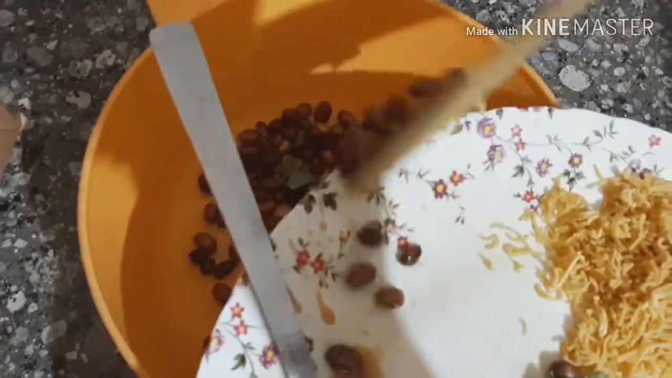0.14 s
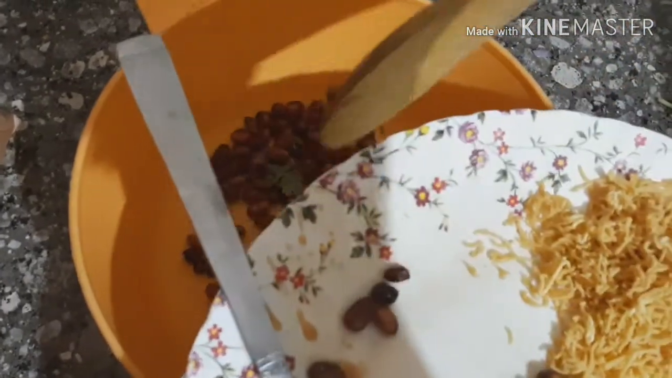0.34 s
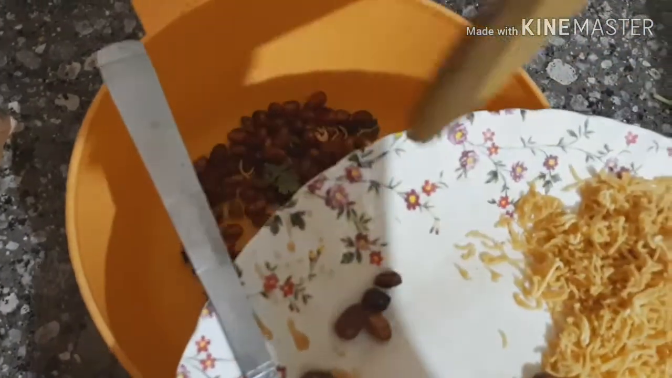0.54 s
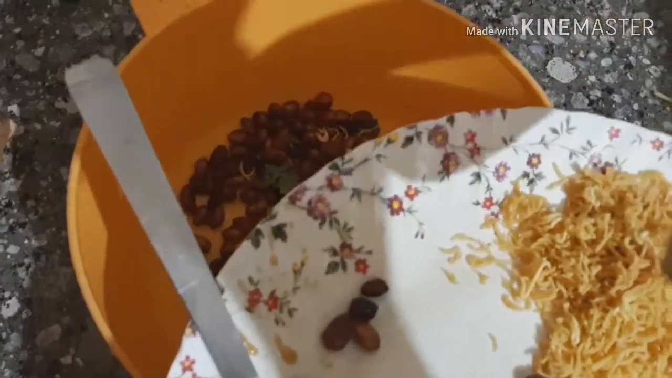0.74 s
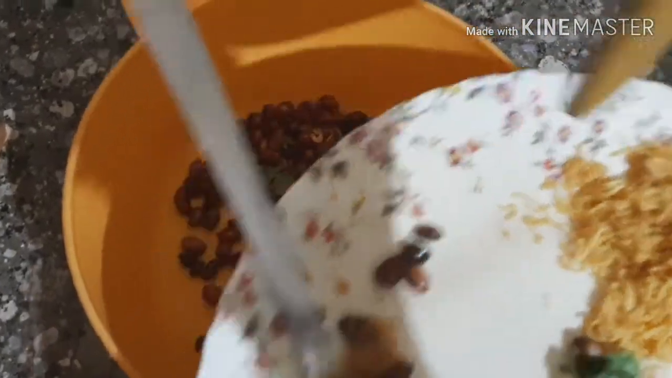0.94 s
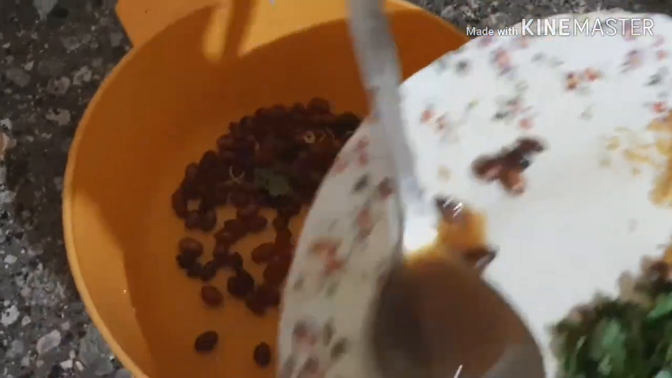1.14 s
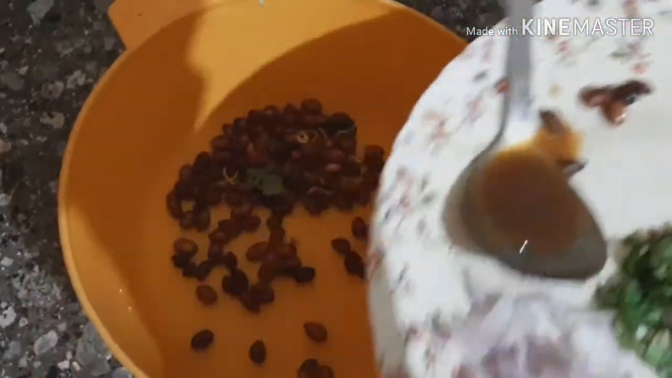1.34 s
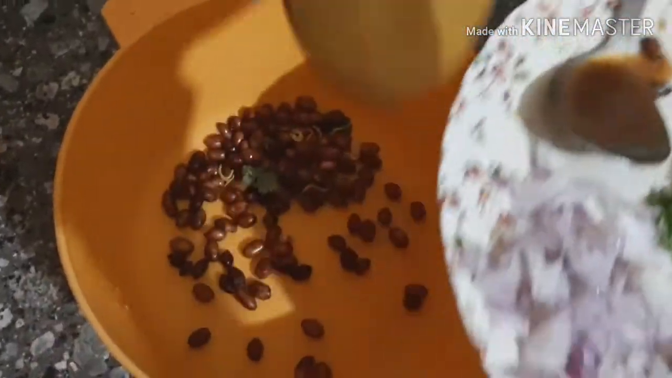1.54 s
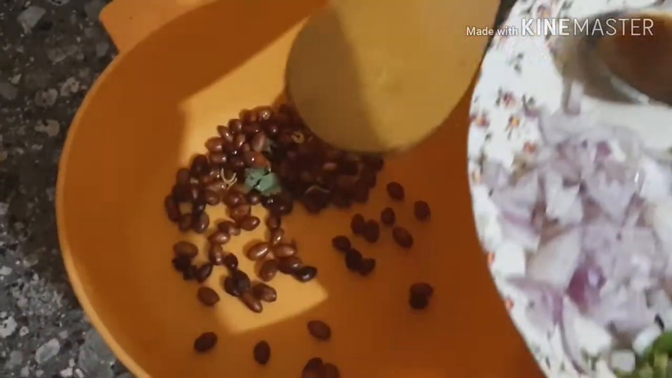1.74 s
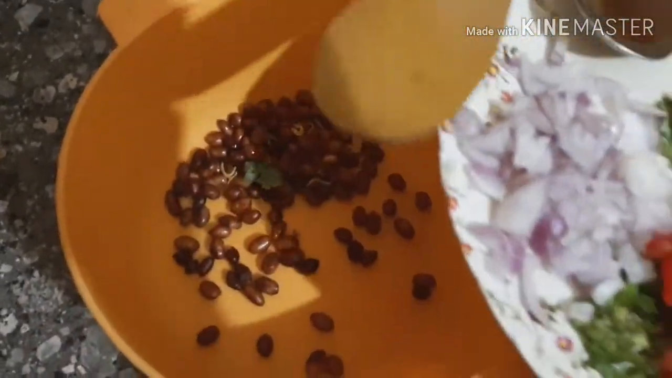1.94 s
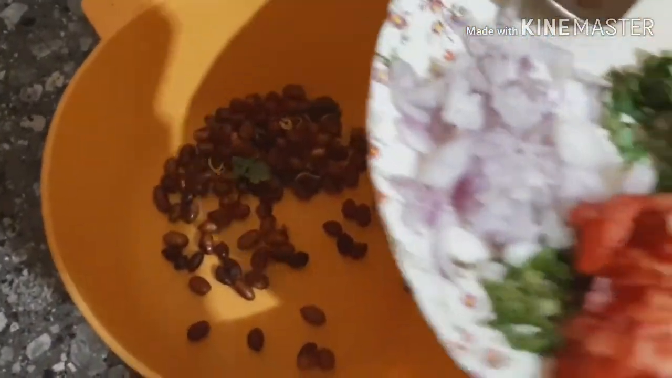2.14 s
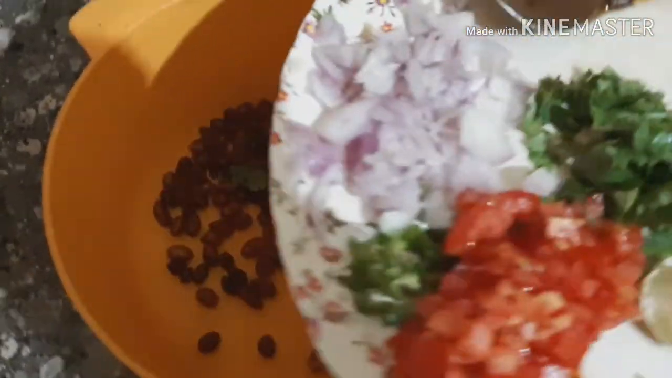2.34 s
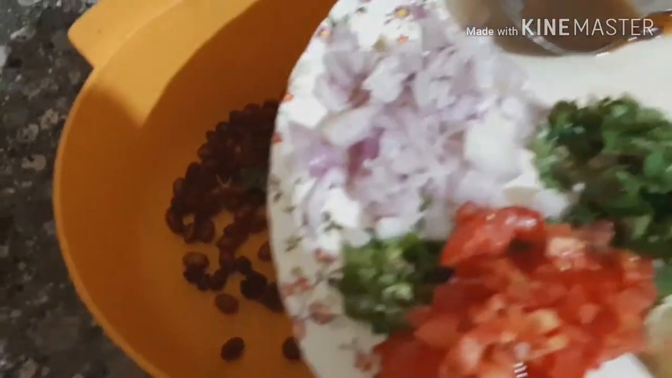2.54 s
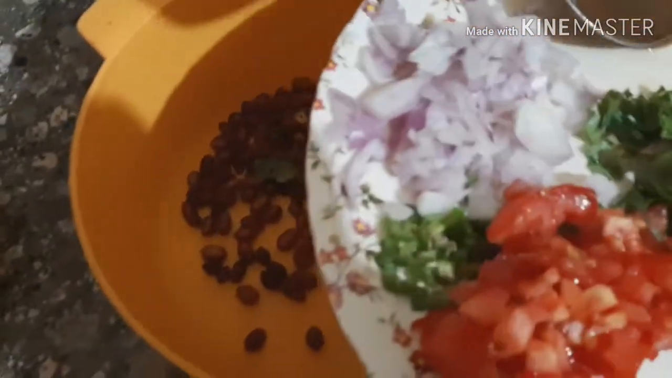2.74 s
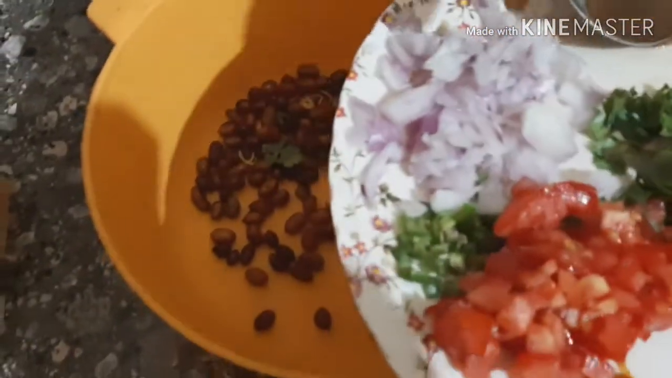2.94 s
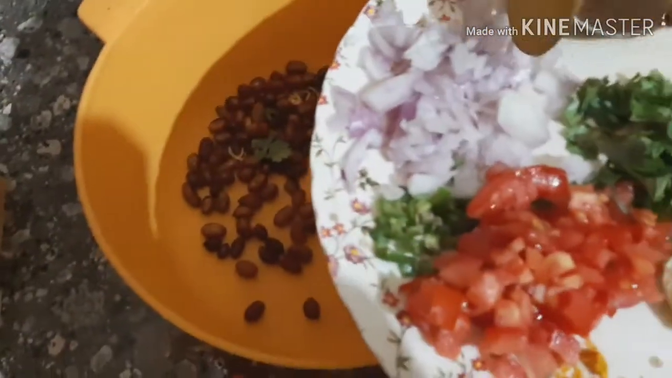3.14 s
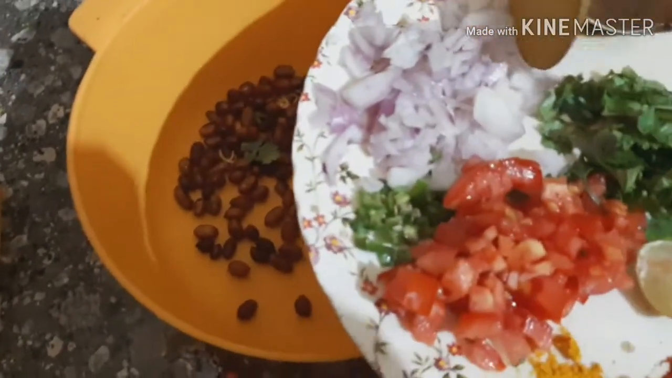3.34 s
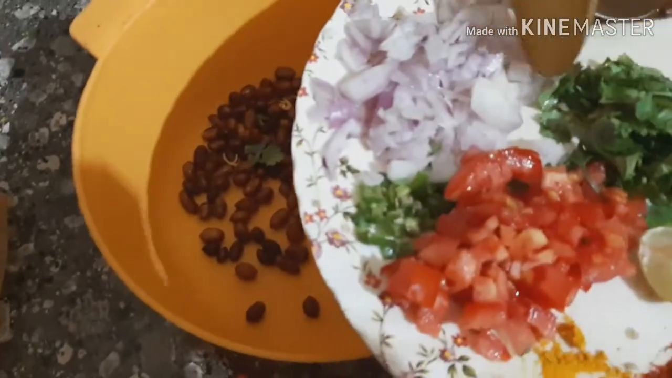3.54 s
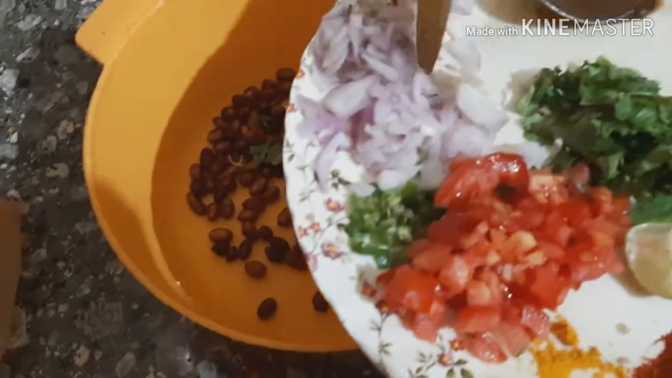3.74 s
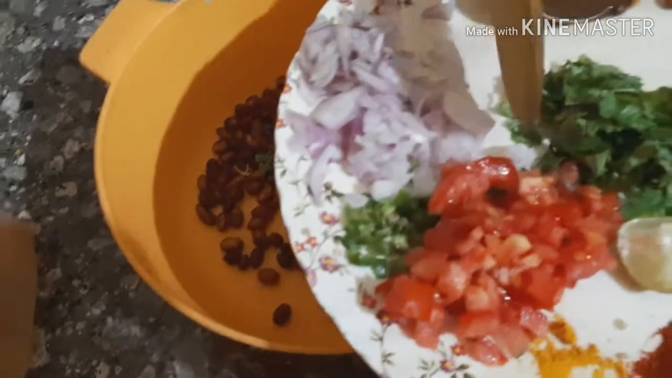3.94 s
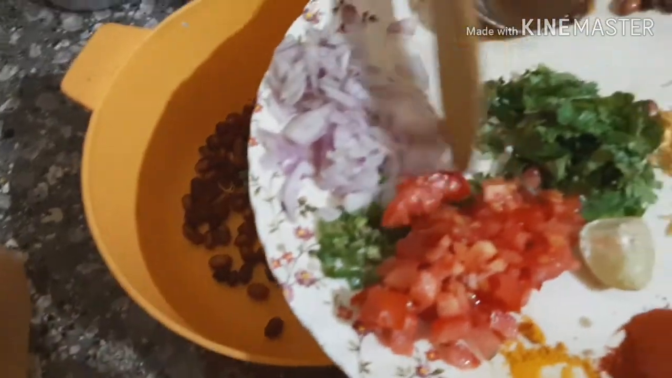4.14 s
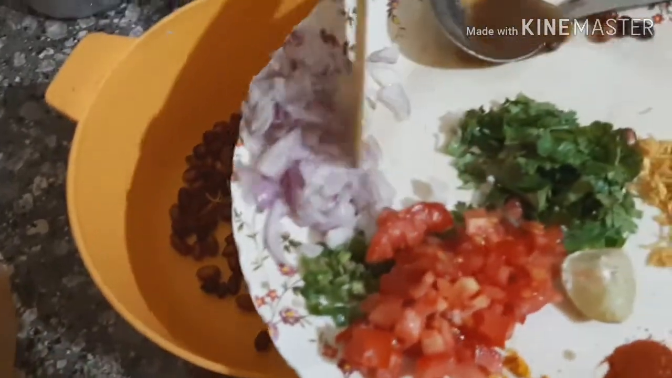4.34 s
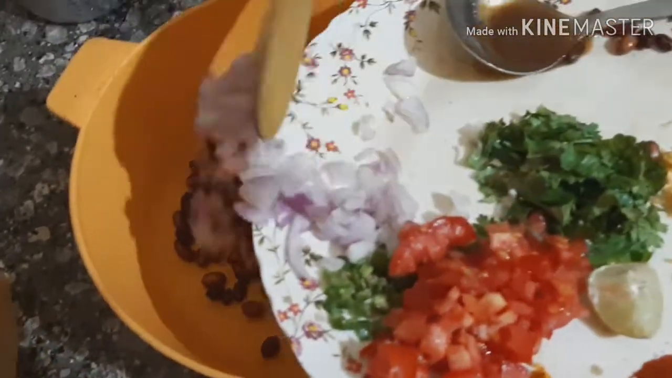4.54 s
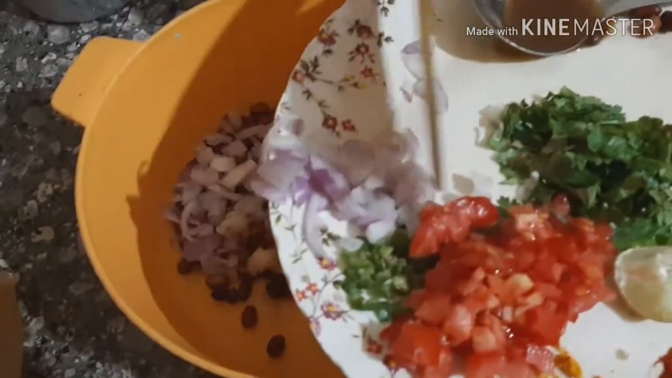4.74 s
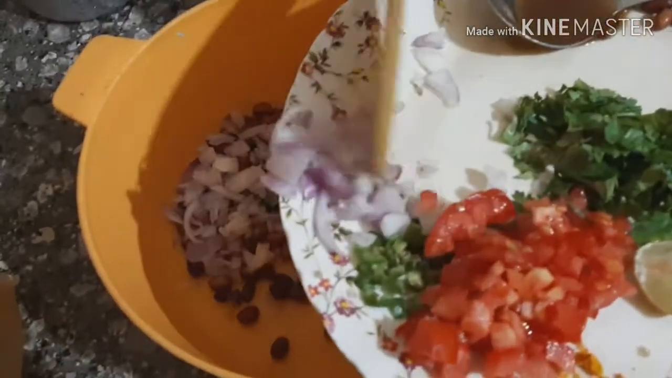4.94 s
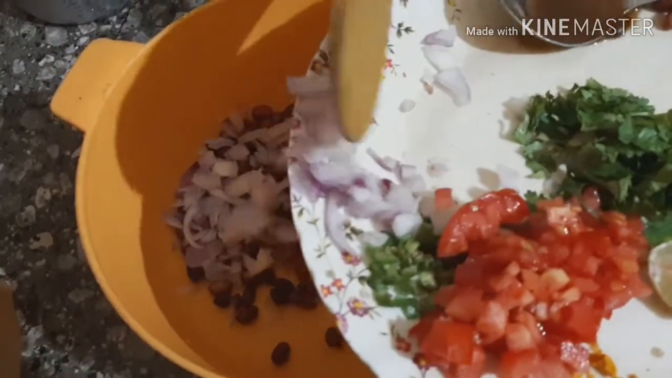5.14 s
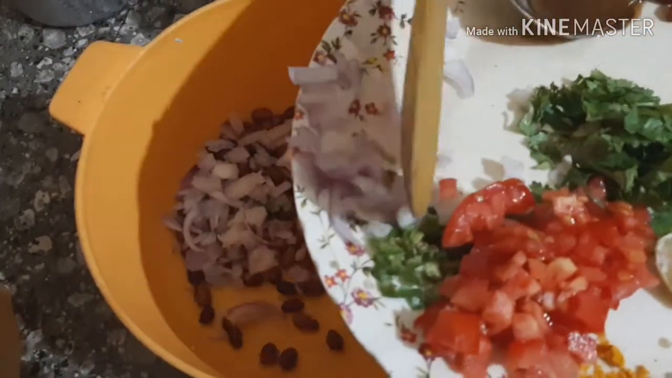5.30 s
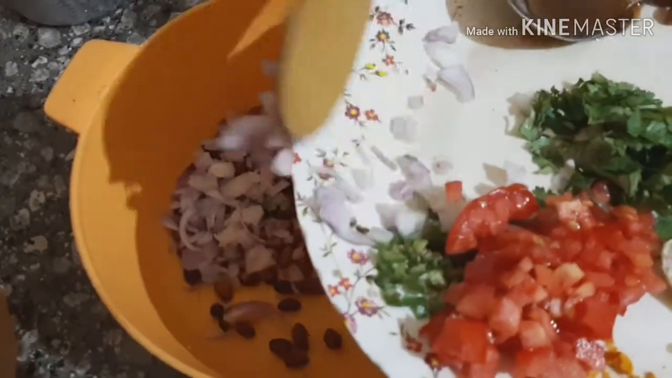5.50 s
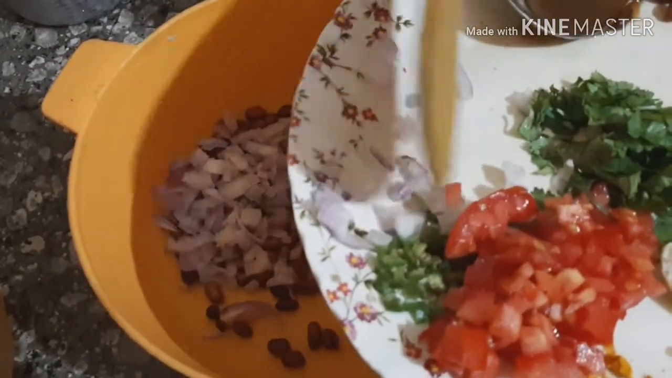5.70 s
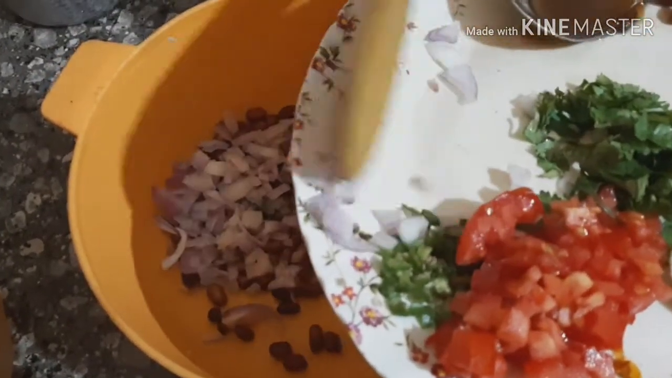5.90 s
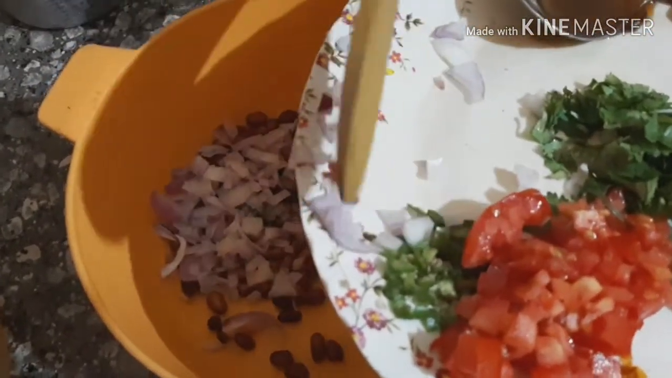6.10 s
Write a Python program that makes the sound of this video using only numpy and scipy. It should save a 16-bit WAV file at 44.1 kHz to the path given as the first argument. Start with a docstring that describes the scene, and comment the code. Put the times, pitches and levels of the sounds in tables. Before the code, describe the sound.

A wooden spatula clacks and scrapes beans and chopped onion off a ceramic plate into a plastic bowl, with quiet pauses in a small kitchen.

```python
"""Scraping a plate into a bowl

A wooden spatula scrapes beans and chopped onion off a ceramic plate into a plastic bowl.
Knocks excite decaying modes of plate and bowl; trains of tiny slips drive the strokes, rustles and slides.
A small hard kitchen answers with sparse decaying taps, over soft noise and a fridge-like hum.
Two microphone ports a few centimetres apart hear the work at slightly different moments."""
import sys
import numpy as np
from scipy import signal
from scipy.fft import irfft
from scipy.io import wavfile
from scipy.ndimage import uniform_filter1d, map_coordinates

SR = 44100
rng = np.random.default_rng(int(sys.argv[2]) if len(sys.argv) > 2 else 0)


def file_out(sig):
    """Save sig as 16-bit WAV at sys.argv[1]."""
    # one column per channel
    cols = np.atleast_2d(sig).T
    # limit, then scale
    lim = np.clip(cols, -1, 1)
    pcm = np.round(lim * 32767).astype(np.int16)
    wavfile.write(sys.argv[1], SR, pcm)


N = 276258

# modes of the free plate, level before differentiation: (frequency [Hz], level [dB], t60 [s])
PLATE_MODES = [(1060, -6, 0.012), (1330, -9.5, .015), (1350, -3.5, 0.076), (1523, 18.5, 0.041),
               (1837, 18, 0.011), (2077, 16.5, 0.019), (2439, 13.5, 0.0036), (2750, -1.5, 0.015),
               (2980, -3.5, 0.019), (3475, 6.5, 0.0042), (3726, -21.5, 0.0085), (4850, -17.5, 0.016),
               (5500, -49, 0.0078), (6060, -31, 0.006)]
# modes of the bowl: (frequency [Hz], level [dB], t60 [s])
BOWL_MODES = [(329, -6.5, 0.17), (437, -10, 0.088), (460, 1.5, 0.035), (582, 7, 0.067), (671, 15.5, 0.024),
              (753, 7.5, 0.02), (825, 6.5, 0.038), (972, 6, 0.033), (1112, -2, .015)]


def gain_of(db):
    """Decibels to gain."""
    return 10 ** (np.asarray(db) / 20)


def evened(x):
    """Scales to rms 1."""
    return x / np.sqrt(np.mean(x ** 2) + 1e-20)


def read(points, hz):
    """Reads a spectrum table on a log-frequency axis."""
    f, value = np.transpose(points)
    return np.interp(np.log(hz + 1), np.log(f + 1), value)


def mix_likeness(left, other, same):
    """Stereo pair whose right side shares the part `same` of the left one, at equal power."""
    return np.array([left, same * left + np.sqrt(1 - same ** 2) * other])


def room_tone():
    """Soft noise and narrow bands of hum, both with drifting patches of level in time and frequency."""
    # noise spectrum: (frequency [Hz], relative level [dB per Hz])
    noise_colour = [(20, -26.5), (40, -15.5), (55, -3), (75, -9.5), (130, -4), (170, -2), (280, -5.5),
                    (420, -12), (700, -20.5), (960, -23), (1400, -21.5), (2500, -22.5), (5000, -21.5),
                    (7500, -22), (8600, -32), (11000, -18), (16000, -22)]
    # left-right likeness of the room tone: (frequency [Hz], likeness [-1 to 1])
    likeness = [(30, 0.2), (60, 1), (300, 0.81), (700, 0.26), (2000, 0.092), (12000, .2)]
    # balance of the room tone: (frequency [Hz], left-right [dB])
    balance = [(100, 3), (500, -5.5), (1500, 1.5), (3000, -3.5), (6000, -13), (14000, 1.5)]
    # bands of the hum: (centre [Hz], half-width at 1/e amplitude [Hz], relative level [dB])
    hum_bands = [(97.3, 13, -0.5), (204, 13.47, -3.5), (279.8, 40, -5), (340, 23.75, -16)]
    # level of the low hum, with low thumps of handling: (time [s], level [dB])
    hum_level = [(0.0, -61), (0.5, -66), (1.049, -74.5), (2.498, -67.5), (3.202, -71.5), (4.498, -69),
                 (5.301, -66.5), (6.26, -74)]
    noise_db, patch_db = -68, 2.2

    frames, hz = N // 1024 + 5, np.fft.rfftfreq(4096, 1 / SR)
    a, b, c, d, patches = rng.standard_normal((frames, 2049, 5)).T
    patches = uniform_filter1d(uniform_filter1d(patches, 40, 0), 4, 1)
    same = np.clip(read(likeness, hz), -1, 1)[:, None]
    spectra = mix_likeness(a + 1j * b, c + 1j * d, same)
    sides = np.array([1, -1])[:, None]
    spectra *= gain_of(sides * read(balance, hz) / 2)[:, :, None]

    hum_power = 0
    for centre_hz, width_hz, db in hum_bands:
        band = evened(np.exp(-((hz - centre_hz) / width_hz) ** 2))
        hum_power = hum_power + (gain_of(db) * band) ** 2
    frame_s = (np.arange(frames) * 1024 - 2048) / SR
    hum_gain = gain_of(np.interp(frame_s, *np.transpose(hum_level)))
    noise = gain_of(noise_db) * evened(gain_of(read(noise_colour, hz)))
    power = hum_power[:, None] * hum_gain ** 2 + noise[:, None] ** 2
    spectra *= np.sqrt(power) * gain_of(patch_db * evened(patches))
    tone = signal.istft(spectra, nperseg=4096, noverlap=3072)[1][:, 2048:N + 2048]
    return np.sqrt(power.mean()) * evened(tone)


def kitchen_echo(x):
    """Sparse taps of random sign, each band dying at its own speed, other taps for each port."""
    # decay of the kitchen: (frequency [Hz], t60 [s])
    decay = [(300, 0.44), (700, 0.34), (1500, 0.34), (3000, 0.33), (6000, 0.33), (12000, 0.091)]
    # spectrum of the echo: (frequency [Hz], relative level [dB])
    colour = [(300, 7.5), (1000, 14), (2500, 14), (5000, 11), (10000, 16.5)]
    # left-right likeness of the echo: (frequency [Hz], likeness [0-1])
    likeness = [(300, 0.99), (700, 0.22), (1500, 0.083), (4000, 0.062)]

    taps = np.zeros((2, SR))
    at = np.arange(200, SR - 20, 20) + rng.integers(0, 20, (2, (SR - 201) // 20))
    np.put_along_axis(taps, at, rng.choice([-1., 1.], at.shape), 1)
    hz, t, spectra = signal.stft(taps, SR, nperseg=256)
    # in the bass both ports hear nearly the same field
    same = np.clip(read(likeness, hz), 0, 1)[:, None]
    spectra = mix_likeness(spectra[0], spectra[1], same)
    t60 = read(decay, hz)[:, None]
    level_db = read(colour, hz)[:, None] - 60 * t / t60
    tail = signal.istft(spectra * gain_of(level_db), SR, nperseg=256)[1]
    return signal.fftconvolve(x[None], tail / np.linalg.norm(tail[0]), axes=1)[:, :N]


def near_reflections(x):
    """Adds nine reflections per port from bowl and counter, 0.2-4.2 ms late, each a differentiated tap."""
    latest_ms, step_db = 4.0, -9.52  # each reflection is two opposite steps of this level
    taps = np.zeros((2, 400))
    at = (10 + rng.random((2, 9)) * latest_ms / 1000 * SR).astype(int)
    np.put_along_axis(taps, at, gain_of(step_db) * rng.choice([-1., 1.], at.shape), 1)
    taps = np.diff(taps, prepend=0)
    taps[:, 0] = 1  # direct sound
    return signal.oaconvolve(x, taps, axes=1)[:, :N]


def two_ports(x, pan_db):
    """Delays the left port by the path difference and splits the level difference between both ports."""
    # path difference as the work moves: (time [s], delay of the left port [ms])
    left_delay = [(.5, -0.21), (.75, 0.36), (1.25, -0.24), (1.75, .1), (2.75, 0.19), (3.25, -0.074),
                  (3.75, -0.047), (4.25, 0.07), (4.6, -0.15), (6.2, -.12)]
    t = np.arange(N) / SR
    delay_samples = np.interp(t, *np.transpose(left_delay)) / 1000 * SR
    left = map_coordinates(x, [np.arange(N) - delay_samples], order=3)
    return np.array([left * gain_of(pan_db / 2), x * gain_of(-pan_db / 2)])


def ring(modes, heights=1):
    """Impulse response of a struck body: decaying sines."""
    hz, db, t60 = np.transpose(modes)[:, :, None]
    t = np.arange(4096) / SR
    return (heights * gain_of(db - 60 * t / t60) * np.sin(2 * np.pi * hz * t)).sum(0)


def plate_halves(heights):
    """The plate's deep and bright modes apart; a stiff plate radiates its acceleration."""
    split_hz = 2150
    deep = (np.transpose(PLATE_MODES)[0] < split_hz)[:, None]
    return np.diff(ring(PLATE_MODES, heights * deep)), np.diff(ring(PLATE_MODES, heights * ~deep))


def rasp_colour():
    """Short bright impulse response of the scraping edge."""
    # spectrum of the rasp: (frequency [Hz], relative level [dB per Hz])
    rasp = [(1470, -31), (2500, -12.5), (3040, -13), (3600, -13), (3860, -16), (5190, -8), (6110, -13.5),
            (11900, -8), (14800, -15), (16000, -18)]
    spectrum = gain_of(read(rasp, np.fft.rfftfreq(256, 1 / SR)))
    return np.fft.fftshift(irfft(spectrum)) * np.hanning(256)


def slips(chatter_db, hiss):
    """Dense train of uneven slips plus hiss; the pressure wavers as the edge chatters over the glaze."""
    slips_per_s, spread_db = 4500, 5.5
    sizes = gain_of(spread_db * np.minimum(rng.exponential(1, N), 5)) * rng.choice([-1, 1], N)
    train = evened(sizes * (rng.random(N) < slips_per_s / SR)) + hiss * rng.standard_normal(N)
    waver = evened(uniform_filter1d(rng.standard_normal(N), 400))
    return evened(train * gain_of(chatter_db * waver))


def pressure(start, rise, hold, fall):
    """One movement: the pressure grows as a power of time, holds, then dies away exponentially."""
    rise_curve, fall_db = 1.08, 33
    # no rise or fall is instant
    rise, fall = abs(rise) + 0.00066, abs(fall) + 1e-3
    t = np.arange(N) / SR - start
    growth = np.clip(t / rise, 0, 1) ** rise_curve
    return growth * gain_of(-fall_db * np.maximum(t - rise - abs(hold), 0) / fall)


def strokes():
    """Slips drive plate, bowl, the bright rasp of the edge and, while the plate slides, its broad bands."""
    # strokes of the edge; pressure() lengthens rise and fall slightly:
    # (start [s], rise [s], hold [s], fall [s], deep plate modes [dB], bright plate modes [dB],
    #  bowl [dB], rasp [dB], left-right [dB])
    edge_strokes = [(0.0, 0.0017, 0.027, 0.29, -43, -49.5, -42.5, -45, -2.5),
                    (0.251, 0.043, 0.044, 0.24, -43, -53, -44.5, -43.5, 6),
                    (0.417, 0.0046, 0.059, .3, -46.5, -53, -49.5, -78, -2),
                    (2.456, 0.064, 0.027, .15, -61.5, -72, -67, -61, -7),
                    (2.611, 0.044, 0.029, 0.048, -71.5, -69, -74.5, -61.5, -11),
                    (2.753, 0.052, 0.014, 0.17, -75.5, -56, -73, -54.5, -5.5),
                    (3.171, 0.048, 0.08, 0.086, -63, -67, -64, -61, -4),
                    (3.427, 0.0064, .02, 0.24, -83.5, -71, -77, -72, -5),
                    (3.543, 0.17, .04, .08, -70.5, -80, -72, -67, -1),
                    (3.653, 0.081, 0.11, 0.17, -59.5, -55.5, -68, -60.5, -6),
                    (4.0, 0.018, 0.007, 0.21, -66, -60.5, -67, -69, -7),
                    (4.126, 0.041, .03, 0.25, -79.5, -78, -74.5, -70.5, -8),
                    (4.548, 0.021, 0.041, 0.068, -75.5, -49, -50.5, -46, 2.1),
                    (4.624, 0.0085, 0.095, .16, -51, -54, -44.5, -47.5, -1.5),
                    (4.83, 0.036, 0.018, 0.15, -68.5, -74, -69.5, -63.5, -13.5),
                    (5.141, 0.038, 0.047, .1, -64, -72.5, -59.5, -62, 1),
                    (5.235, 0.0076, 0.018, 0.2, -55.5, -81, -49.5, -60, -0.5),
                    (5.387, 0.043, .02, .14, -72, -77.5, -73, -68.5, -11.5),
                    (5.645, 0.04, 0.037, 0.18, -66, -68, -55, -52.5, 0.5),
                    (5.826, 0.034, 0.047, 0.13, -63, -62.5, -52, -64.5, -9)]
    # food rustles, rasp only: (start [s], rise [s], hold [s], fall [s], level [dB], left-right [dB])
    rustles = [(0.776, 0.011, 0.027, 0.27, -69, 5.5), (0.905, 0.022, 0.019, 0.87, -72.5, -16),
               (1.201, 0.045, 0.023, .1, -70, -12), (1.335, .008, 0.021, 0.19, -69.5, -5),
               (1.404, 0.035, 0.024, 0.12, -79.5, -2.1), (1.618, 0.036, .02, 0.22, -67.5, -8),
               (1.776, 0.033, 0.064, .12, -66, -9.5), (2.03, 0.05, 0.099, .2, -68, -13),
               (2.135, 0.084, 0.24, 0.13, -60.5, -4)]
    # the plate slides on the bowl's rim, one table per slide: (time [s], low bands [dB], high bands [dB])
    slides = [
        [(1.45, -89, -93), (1.58, -78.5, -94), (1.665, -66.5, -66), (1.77, -69, -70.5), (1.83, -63.5, -56.5),
         (1.92, -55, -54.5), (2.0, -60, -59.5), (2.065, -47.5, -60), (2.2, -95, -68.5)],
        [(2.43, -83, -83), (2.48, -64.5, -66.5), (2.515, -58, -77), (2.545, -54, -61), (2.6, -76, -76),
         (2.68, -80, -82)],
        [(3.138, -74, -81), (3.146, -57, -73), (3.2, -53.5, -67), (3.23, -59, -72), (3.29, -50.5, -68),
         (3.38, -83, -84)],
    ]
    # low bands, level before differentiation: (frequency [Hz], level [dB], t60 [s])
    slide_low = [(357, 11, 0.017), (472, 3, 0.047), (827, 3, 0.0087), (1082, 7.5, 0.012),
                 (1380, -1.5, 0.025)]
    # high bands, level before differentiation: (frequency [Hz], level [dB], t60 [s])
    slide_high = [(1820, 17.5, 0.014), (2056, 6.5, 0.035), (2850, 17, 0.0058), (3690, 6, 0.035),
                  (4240, 5, 0.016), (4770, -6.5, 0.046), (5320, -3.5, 0.063), (6030, -34.5, 0.0098),
                  (7420, -32, 0.018)]
    damping_t60_s = 0.026

    rows = list(edge_strokes)
    for *shape, db, pan_db in rustles:
        rows.append((*shape, -np.inf, -np.inf, -np.inf, db, pan_db))
    rows = np.array(rows)
    power = np.array([pressure(*row[:4]) for row in rows]) ** 2
    body_power = gain_of(rows[:, 4:8]) ** 2
    levels = np.sqrt(body_power.T @ power)
    # the loudest movement sets the side
    weight = body_power.sum(1)
    pan_db = (weight * rows[:, 8]) @ power / (weight @ power + 1e-30)

    t, slide_levels = np.arange(N) / SR, np.zeros((2, N))
    for times, *columns in map(np.transpose, slides):
        slide_levels += gain_of([np.interp(t, times, db, left=-np.inf, right=-np.inf) for db in columns])

    # while the spatula touches the plate, it damps the ring
    held = gain_of(-60 * np.arange(4095) / SR / damping_t60_s)
    deep, bright = held * plate_halves(1)
    drive, out = slips(chatter_db=0.5, hiss=1.0), np.zeros(N)
    bodies = (deep, bright, ring(BOWL_MODES), rasp_colour(),
              np.diff(ring(slide_low)), np.diff(ring(slide_high)))
    for level, body in zip([*levels, *slide_levels], bodies):
        out += signal.oaconvolve(level * drive, body / np.linalg.norm(body))[:N]
    return out, pan_db


def knocks():
    """Each blow is a short touch and a little chatter; it rings plate and bowl at another spot and ticks."""
    # knocks of wood on plate and bowl:
    # (time [s], bright plate modes [dB], deep plate modes [dB], bowl [dB], tick [dB], left-right [dB])
    wood_knocks = [(0.046, -50, -36.5, -59, -86, 15), (0.2565, -29, -28.5, -39.5, -41, 0.5),
                   (0.272, -26, -44, -63, -42, -3), (0.2939, -18.5, -45, -59, -48, 8.5),
                   (0.3058, -37, -24, -44, -31.5, -5), (0.328, -19.5, -32, -32.5, -32, 10),
                   (0.3331, -31.5, -23, -37, -38, -11.5), (0.3393, -46, -28, -49, -35, 11),
                   (0.4253, -29, -26.5, -28, -43, 4.5), (0.4358, -45, -44.5, -51, -53, -20),
                   (0.4651, -30.5, -44, -56, -49, 7), (0.471, -36.5, -43, -51, -61, -15),
                   (0.5013, -59, -61, -40, -74, -1), (0.615, -50, -59, -56, -63, 1),
                   (1.8972, -46.5, -60, -70, -51, 10), (1.958, -41.5, -56, -74, -63, 8),
                   (2.029, -49, -56, -69, -63, 16), (2.041, -44, -51, -49.5, -54, 4),
                   (2.0573, -41.5, -45, -49, -61, 12.5), (2.0843, -49, -47, -57, -52, -1),
                   (2.5194, -42.5, -40, -51, -62.5, 3.5), (3.141, -76.5, -61, -42, -72, -1),
                   (3.691, -59, -54, -62.5, -57, -4), (4.0198, -46, -46, -54, -49, 2),
                   (4.566, -46, -43.5, -62, -51, 9), (4.585, -53, -43.5, -59, -54, 7),
                   (4.5901, -37, -41, -60, -51, -7), (4.6252, -25, -34.5, -66, -39, 7.5),
                   (4.6421, -29, -49, -60, -40, 2), (4.6589, -46, -31, -55, -38.5, 2),
                   (4.6989, -32.5, -37.5, -57, -42.5, 12.5), (4.7153, -57, -32, -32.5, -50, 2),
                   (5.238, -79, -43, -49.5, -73, 6), (5.661, -67, -53, -56.5, -68, 6),
                   (5.6771, -60, -56, -55, -54, -0.5), (5.6955, -46.5, -44, -47.5, -49, 5.5),
                   (5.7097, -37.5, -51, -50, -60, 0), (5.7423, -51, -42.5, -47, -50, -1),
                   (5.7921, -57.5, -47.5, -45.5, -67.5, 1), (5.8218, -55, -43, -23.5, -58, -3)]
    # lone small ticks of beans and crumbs: (time [s], level [dB], pitch [Hz], left-right [dB])
    crumb_ticks = [(0.7654, -52.5, 3580, -11), (0.7926, -61.5, 6060, -36), (1.3424, -56.5, 6550, -4),
                   (1.4329, -63, 6600, -10.5), (1.6896, -63, 5600, -3), (2.661, -59, 6700, 11),
                   (3.4354, -56.5, 6840, -4), (3.5337, -67.5, 6800, -4.5), (3.96, -63, 7000, -1),
                   (5.1977, -55.5, 7000, 4), (5.452, -62, 4710, -16), (6.2411, -54, 3330, -5.5)]
    knock_tick_hz, knock_pitched_share = 4246, 0.61
    knock_ping_s, crumb_ping_s = 0.00024, 0.00034  # time constants of the pitched part
    crumb_ring_db, pure_below_hz = -13, 3940  # plate ring re tick; higher ticks are noisier
    chatter, chatter_t60_s, crumb_chatter = 0.22, 0.011, 0.25
    spot_spread_db, pan_limit_db = 2.5, 16

    rows = [(*row, knock_tick_hz, knock_pitched_share, knock_ping_s) for row in wood_knocks]
    for s, db, hz, pan_db in crumb_ticks:
        pitched = min((pure_below_hz / hz) ** 2, 1)
        rows.append((s, db + crumb_ring_db, -np.inf, -np.inf, db, pan_db, hz, pitched, crumb_ping_s))

    out, pan, t = np.zeros(N + 4096), np.zeros(N), np.arange(4096) / SR
    draws = rng.standard_normal((len(rows), 300 + len(PLATE_MODES) + len(BOWL_MODES)))
    heights_all = gain_of(spot_spread_db * draws[:, 300:, None])
    contacts = chatter * draws[:, :300] * gain_of(-60 * t[:300] / chatter_t60_s)
    # a lone crumb hardly chatters
    contacts[len(wood_knocks):] *= crumb_chatter
    contacts[:, 0] = 1
    crack = evened(np.pad(rasp_colour()[100:], (0, 4096 - 156)))

    for k in np.argsort([row[0] for row in rows]):
        s, bright_db, deep_db, bowl_db, tick_db, pan_db, hz, pitched, ping_s = rows[k]
        heights, contact = heights_all[k], contacts[k]
        tone = evened(np.sin(2 * np.pi * hz * t) * t * np.exp(-t / ping_s))
        tick = pitched * tone + (1 - pitched) * crack
        # wood on glaze gives a little; the soft bowl is pushed more slowly still
        touch, push = np.convolve(contact, np.hanning(8)), np.hanning(20)
        deep, bright = plate_halves(heights[:len(PLATE_MODES)])
        bowl = ring(BOWL_MODES, heights[len(PLATE_MODES):])
        parts = ((bright_db, touch, bright), (deep_db, touch, deep),
                 (bowl_db, push, bowl), (tick_db, contact, tick))
        for db, force, body in parts:
            sound = signal.fftconvolve(force, body)[:4095]
            # levels count the first 200 samples
            out[round(s * SR):][:4095] += gain_of(db) * sound / np.std(sound[:200])
        # the side holds until the next blow
        pan[max(round(s * SR) - 40, 0):] = np.clip(pan_db, -pan_limit_db, pan_limit_db)
    return out[:N], pan


def scene():
    """Knocks and rubbing, their echo in the kitchen, and the room tone."""
    knock_echo_db, stroke_echo_db = -4.5, -4
    blows, blow_pan_db = knocks()
    rubs, rub_pan_db = strokes()
    echo = kitchen_echo(gain_of(knock_echo_db) * blows + gain_of(stroke_echo_db) * rubs)
    work = near_reflections(two_ports(blows, blow_pan_db)) + two_ports(rubs, rub_pan_db) + echo
    # small dishes radiate no deep bass
    high_pass = signal.butter(4, 330, "high", fs=SR, output="sos")
    return signal.sosfilt(high_pass, work) + room_tone()


def record(dry):
    """Unequal ports, then the band limit of the recorder."""
    # the left port is weaker in the bass: (frequency [Hz], left-right [dB])
    port_balance = [(100, -9), (300, -3.5), (700, -2.5), (1500, -2)]
    band_limit_hz = 15700
    hz = np.linspace(0, SR / 2, 513)
    pair = [signal.firwin2(1023, hz, gain_of(side * read(port_balance, hz) / 2), fs=SR) for side in (1, -1)]
    heard = signal.oaconvolve(dry, np.array(pair), "same", axes=1)
    low_pass = signal.firwin(511, band_limit_hz, window=("kaiser", 9), fs=SR)
    return signal.oaconvolve(heard, low_pass[None], "same")


dry = scene()
out = record(dry)
file_out(out)
```